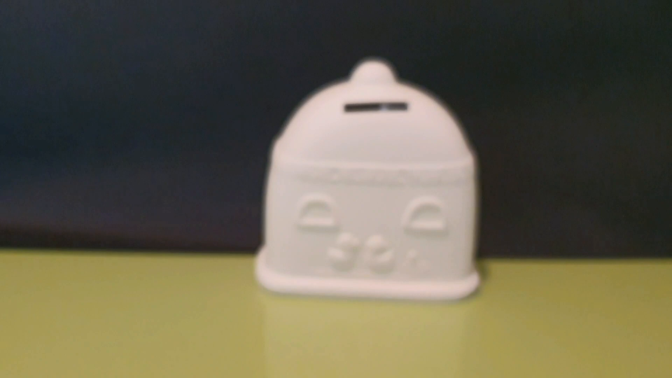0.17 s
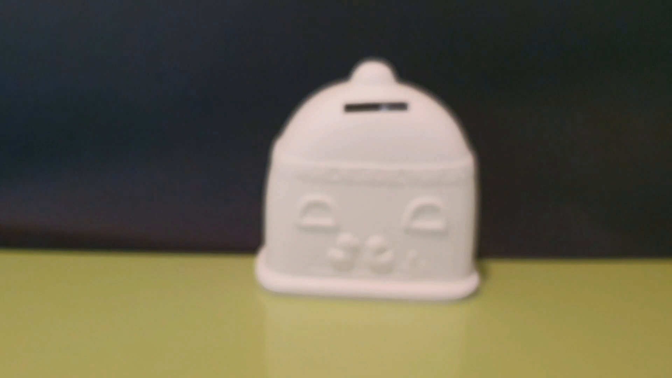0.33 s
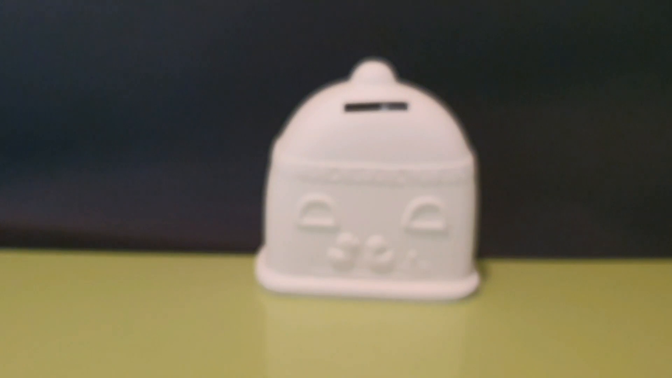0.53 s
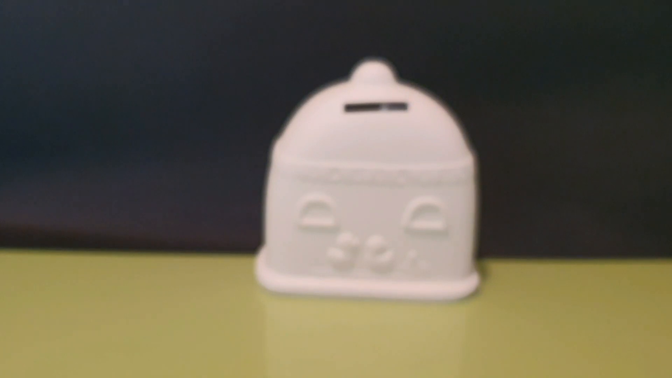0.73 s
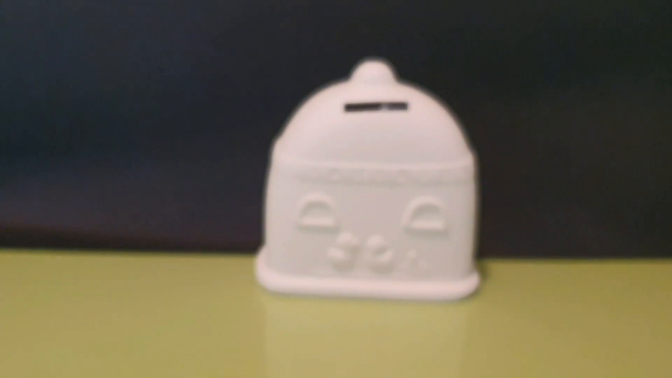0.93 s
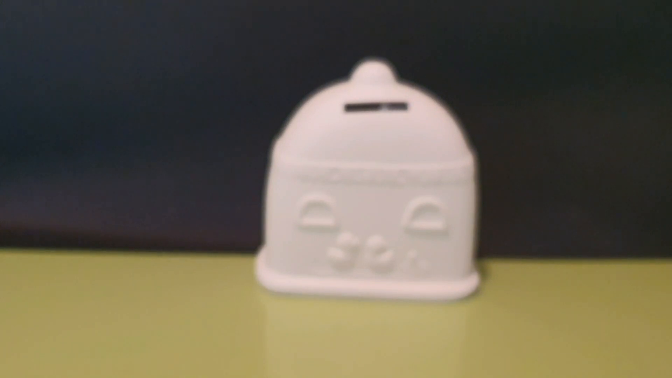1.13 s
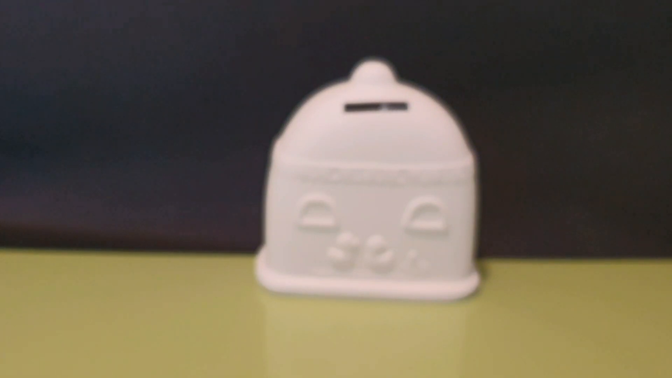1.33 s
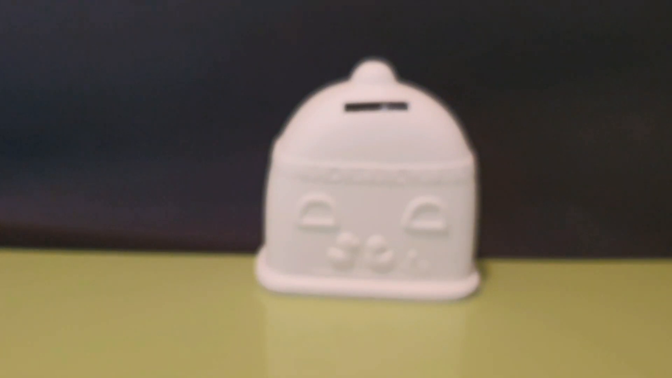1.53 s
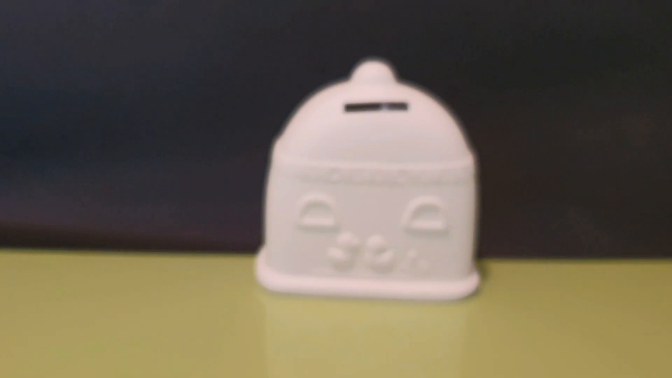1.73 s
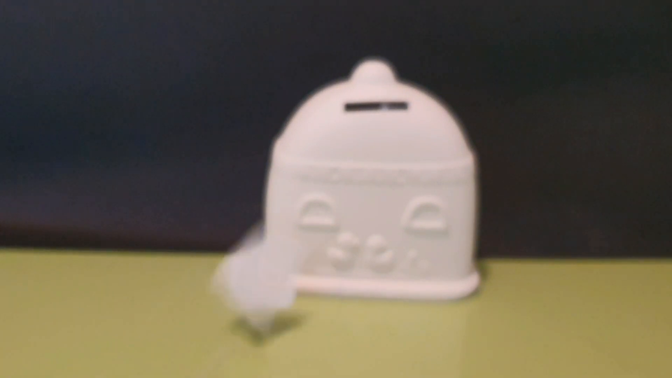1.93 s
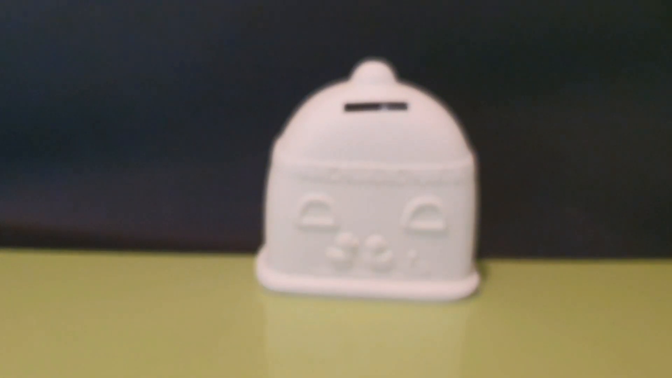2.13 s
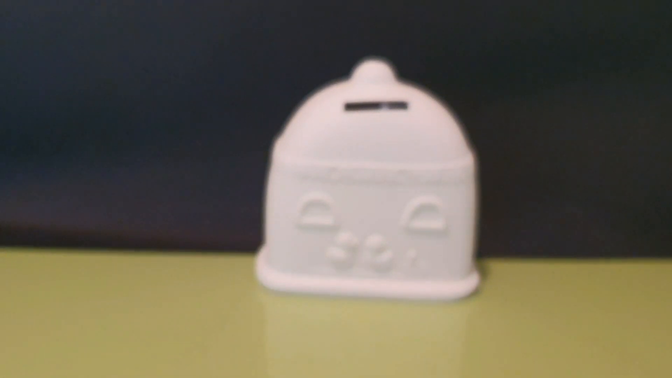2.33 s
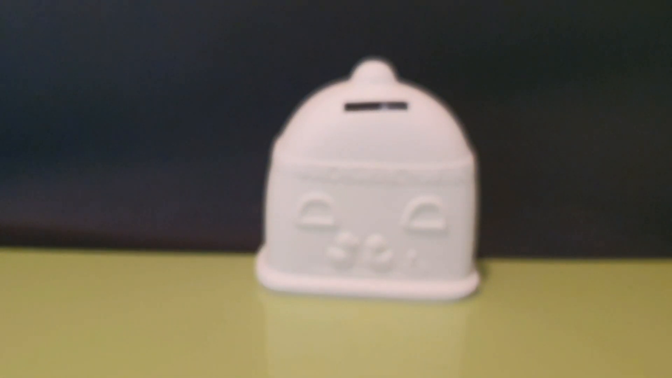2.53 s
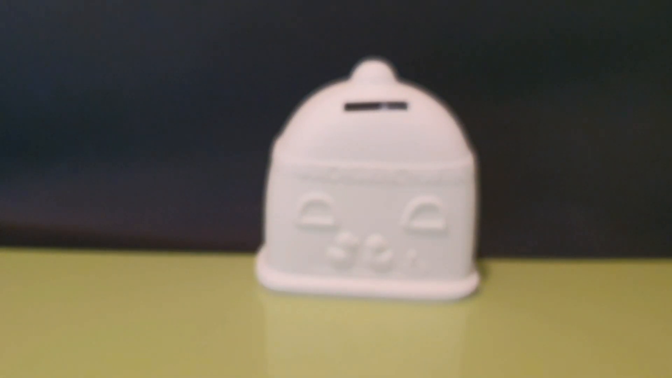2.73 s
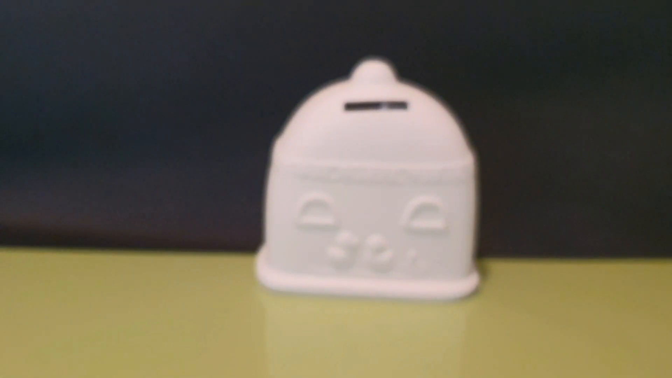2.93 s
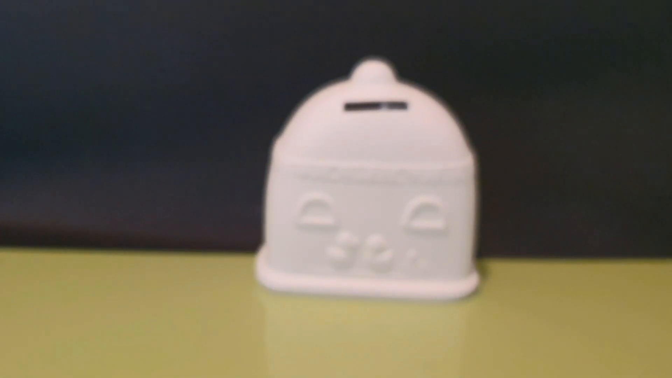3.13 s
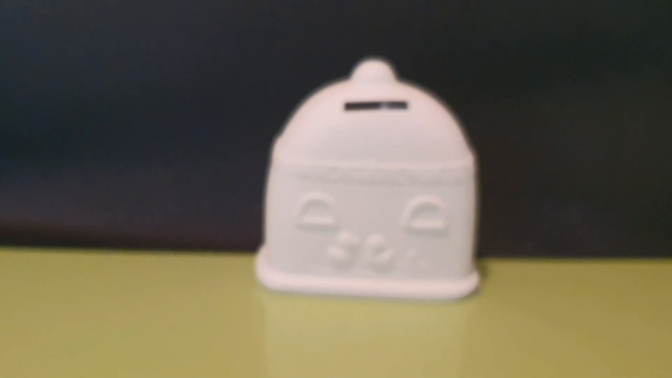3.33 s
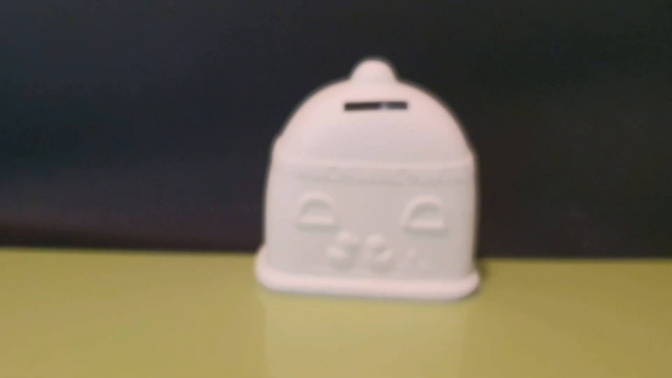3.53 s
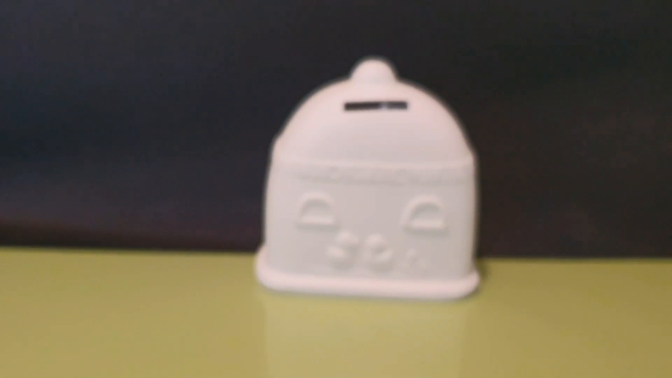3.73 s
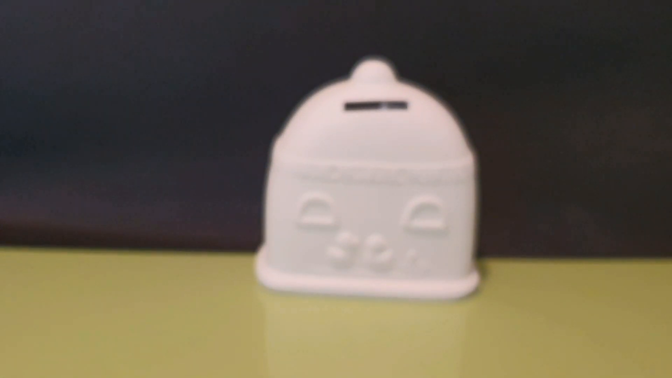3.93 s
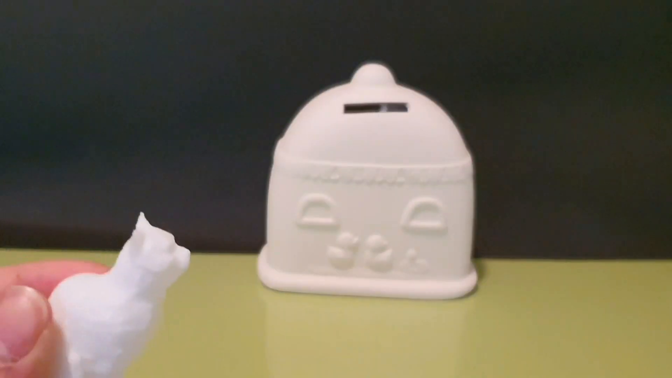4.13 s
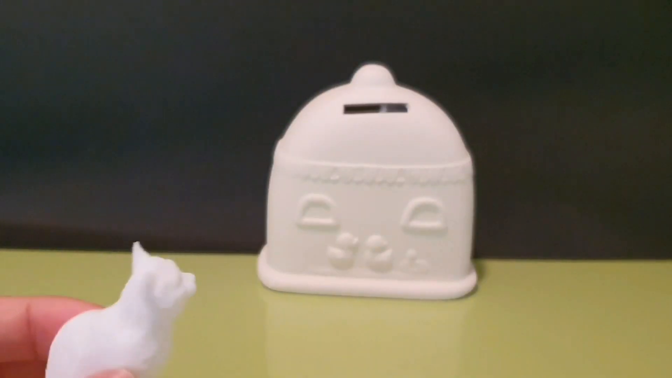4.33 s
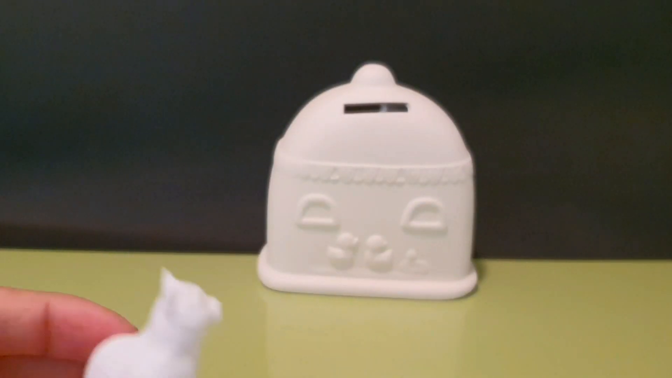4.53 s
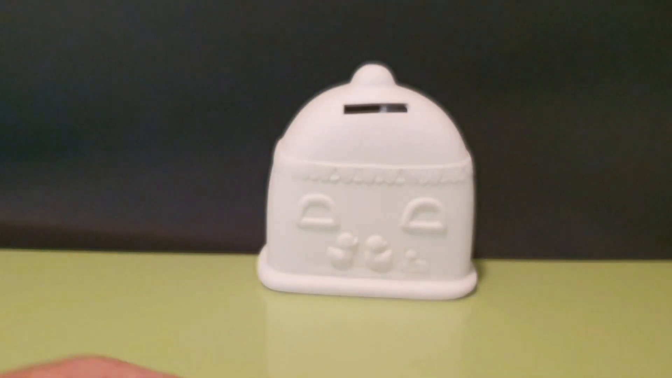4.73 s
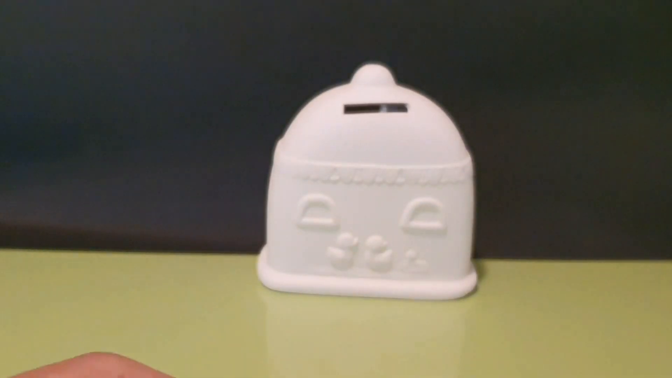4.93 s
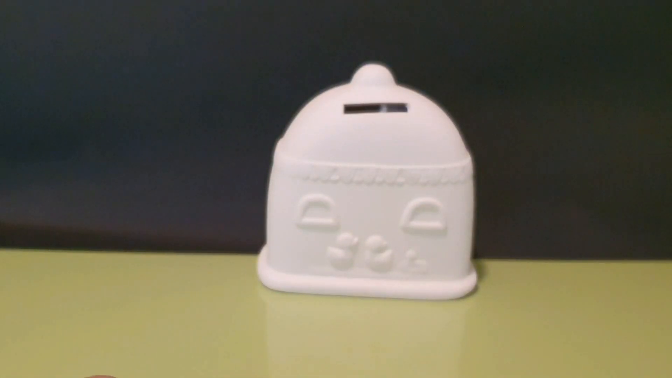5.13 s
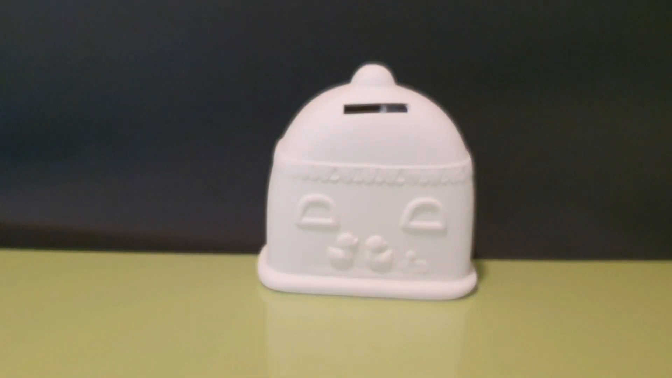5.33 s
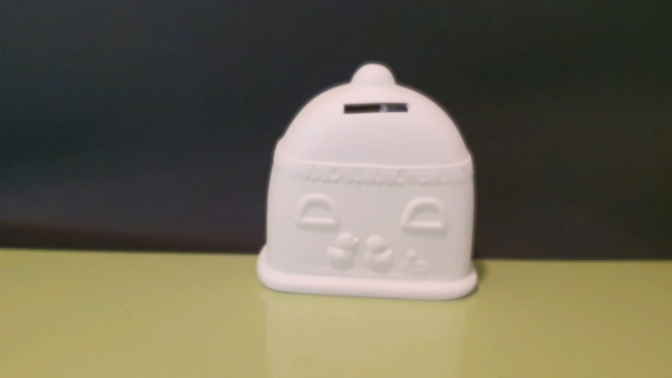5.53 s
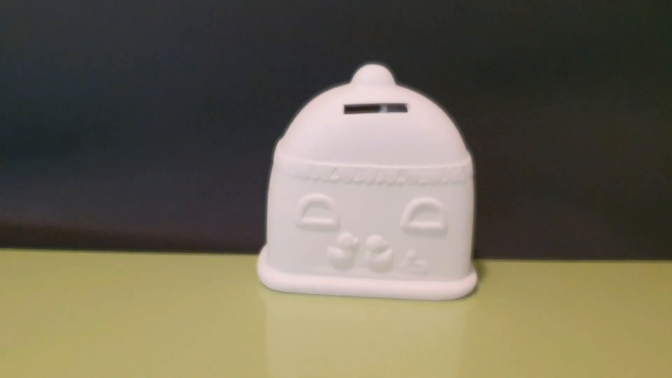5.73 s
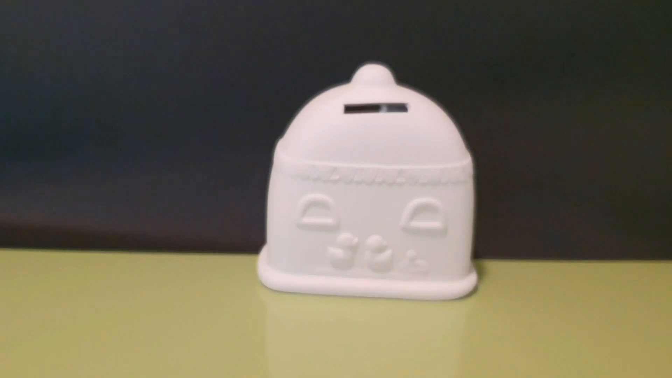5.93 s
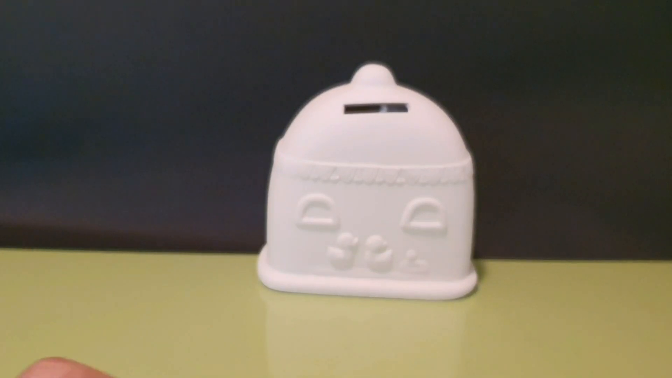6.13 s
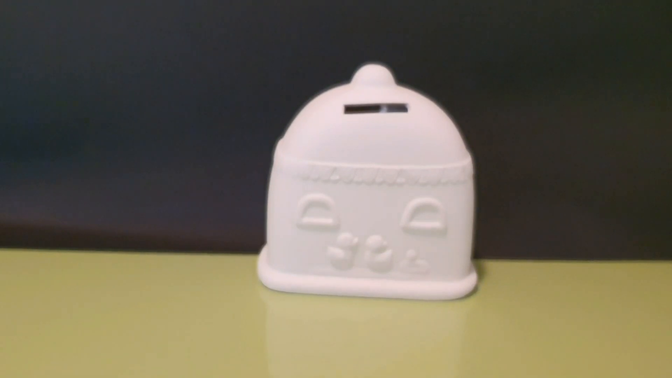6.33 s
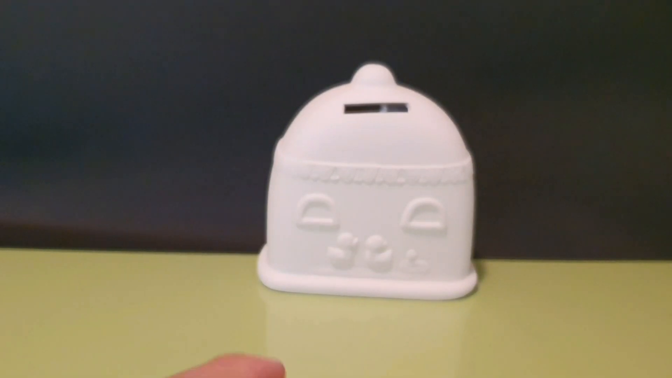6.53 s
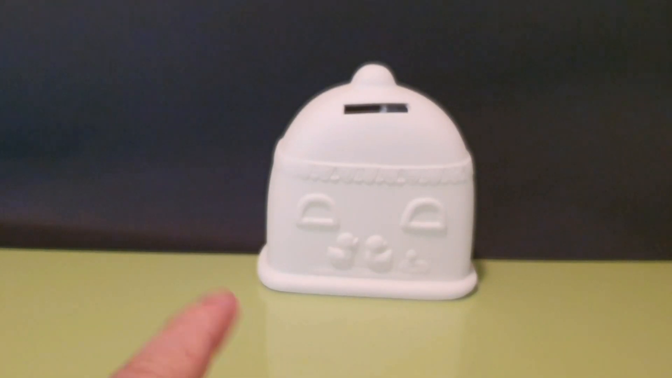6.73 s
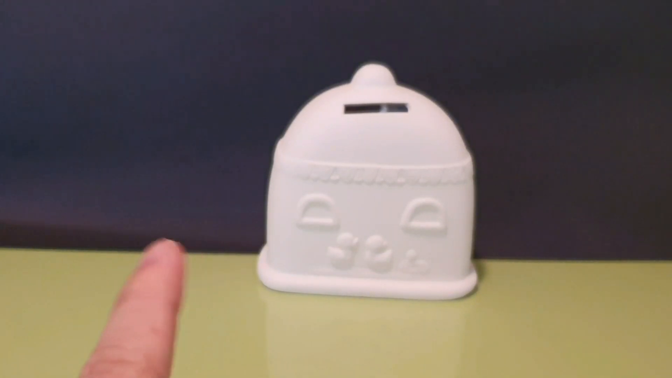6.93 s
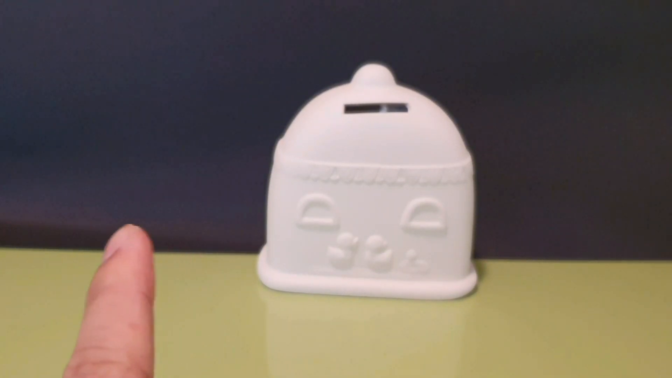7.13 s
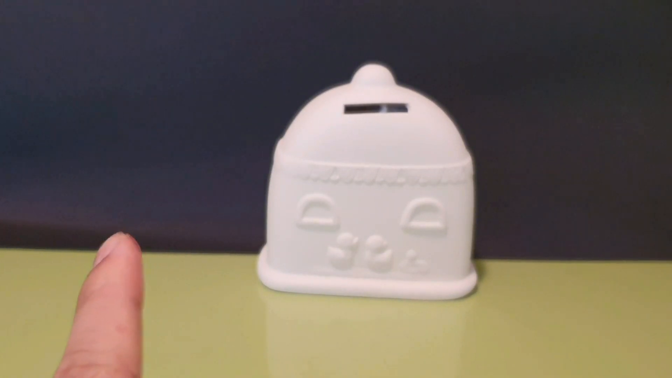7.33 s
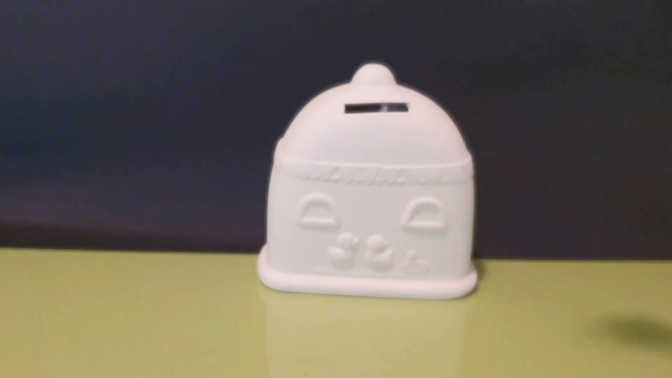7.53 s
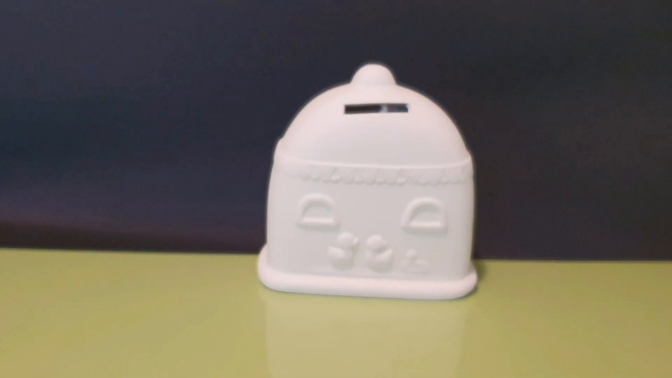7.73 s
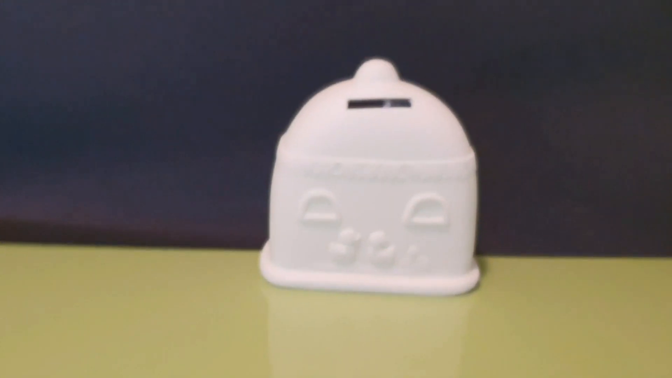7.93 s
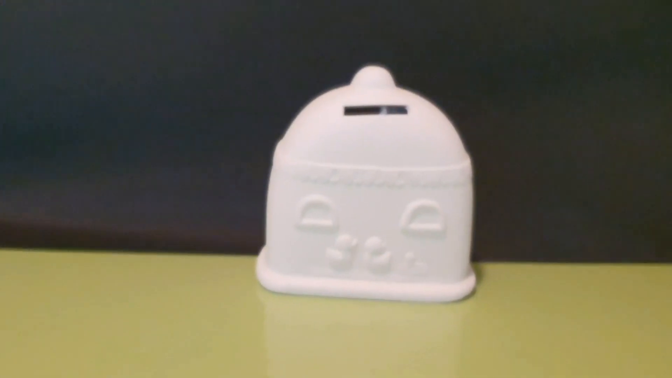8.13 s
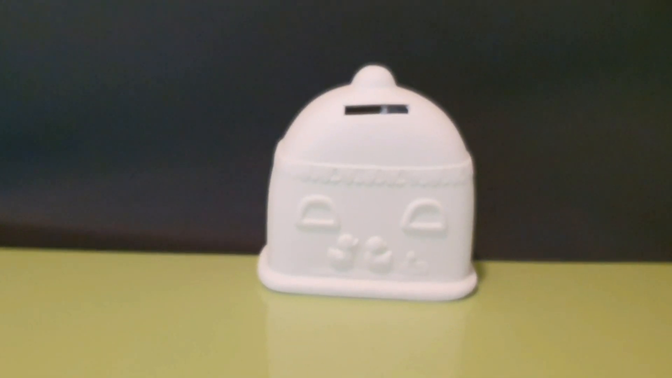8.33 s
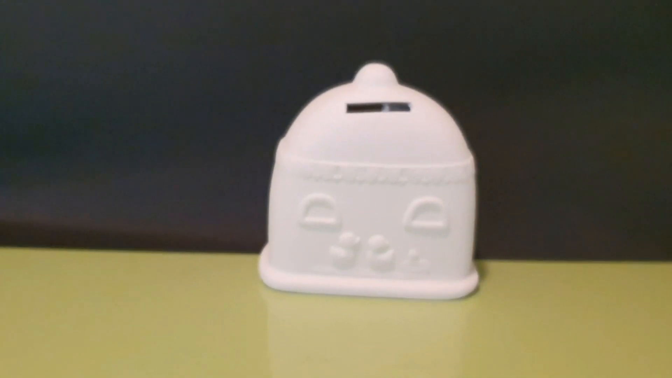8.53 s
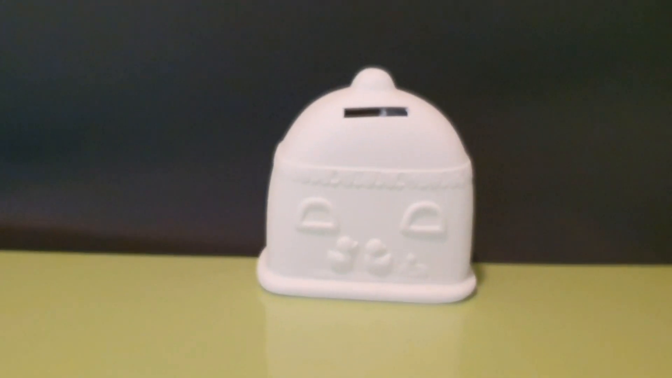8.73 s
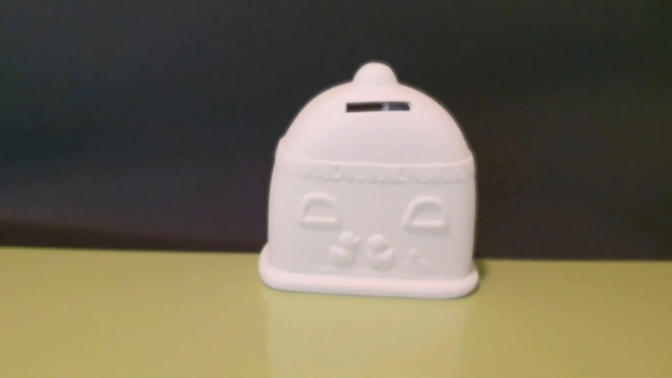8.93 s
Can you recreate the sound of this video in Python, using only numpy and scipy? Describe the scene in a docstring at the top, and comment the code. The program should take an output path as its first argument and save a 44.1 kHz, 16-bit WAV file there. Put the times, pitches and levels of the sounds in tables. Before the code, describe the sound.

Small hard plastic toys handled on a tabletop, miked closely indoors. Soft ticks lead to a sudden loud snap and quickly fading bounces. Near-silence follows, with faint skin rub and a short creak. Crisp taps and a quick irregular rattle come as a hollow figurine is placed and rocked. Another sharp crack rings briefly, then it lands to the right with a clack and brushing fabric. Short echoes, faint hum.

```python
"""Plastic toys on a table

Small hard plastic toys are handled on a table in a quiet, slightly echoing room. A block is flicked and
tumbles away; a figurine is set down and rocked, then flicked against a money box and lands with a clatter.
Each knock is a shaped burst that sets decaying tones ringing and fills the room with echoes.
Rubbing, creaking, rustling cloth, rumble, hiss and a faint low hum are shaped noise."""
import sys
import numpy as np
from scipy import signal
from scipy.fft import rfft, irfft, next_fast_len
from scipy.io import wavfile
from scipy.ndimage import uniform_filter1d

SR = 44100
rng = np.random.default_rng(int(sys.argv[2]) if len(sys.argv) > 2 else 0)


def bounce(signal):
    """Save signal as a 16-bit WAV file at the path given by the first command-line argument."""
    frames = np.transpose(np.atleast_2d(signal))
    limited = np.clip(frames, -1, 1)
    pcm = np.round(limited * 32767).astype(np.int16)
    wavfile.write(sys.argv[1], SR, pcm)


N = 395577
TIME = np.arange(N) / SR


def from_db(db):
    """Decibels to gain."""
    return 10 ** (np.asarray(db) / 20)


def rms_one(x):
    """Scale to rms 1."""
    return x / np.sqrt(np.mean(x ** 2) + 1e-20)


def unit_energy(x):
    """Scale each channel to the energy of a unit click."""
    return x / np.sqrt(np.sum(x ** 2, axis=-1, keepdims=True) + 1e-20)


def at_hz(points, hz):
    """Read (f/Hz, value) points on a log-frequency axis."""
    known_hz, values = np.transpose(points)
    return np.interp(np.log(np.maximum(hz, 1)), np.log(known_hz), values)


def in_time(rows):
    """Read each column of a curve at every sample."""
    s, *columns = np.transpose(rows)
    return [np.interp(TIME, s, column) for column in columns]


def swells(rows):
    """Smooth swells (middle t/s, length/s, level/dB), summed in power."""
    power = 0
    for middle_s, length_s, db in rows:
        distance = 2 * (TIME - middle_s) / length_s
        power = power + from_db(2 * db) * np.exp(-np.minimum(distance ** 2, 60))
    return np.sqrt(power)


# How alike left and right are [f/Hz, correlation from -1 to 1]
LEFT_RIGHT_LIKENESS = [(30, 0.97), (60, 0.91), (125, 0.5), (250, 0.6), (700, -0.18), (3000, 0.014),
                       (16000, -0.36)]


def stereo_spectrum(size):
    """Frequencies and spectrum of white stereo noise, most alike in both channels in the bass."""
    hz = np.fft.rfftfreq(size, 1 / SR)
    mid, side = rfft(rng.standard_normal((2, size)))
    alike = np.clip(at_hz(LEFT_RIGHT_LIKENESS, hz), -.99, .99)
    return hz, np.sqrt(1 + alike) * mid + np.sqrt(1 - alike) * side * [[1], [-1]]


def noise(gain_at):
    """Stereo noise of rms 1 whose spectrum follows a function of frequency."""
    hz, white = stereo_spectrum(next_fast_len(N, real=True))
    return rms_one(irfft(white * gain_at(hz))[:, :N])


def noise_through(points):
    """Stereo noise of rms 1 shaped by (f/Hz, level/dB) points."""
    return noise(lambda hz: from_db(at_hz(points, hz)))


def coloured(x, points):
    """Filter through (f/Hz, level/dB) points with no sound ahead of the input (minimum phase)."""
    cepstrum = irfft(np.log(from_db(at_hz(points, np.fft.rfftfreq(len(x), 1 / SR)))))
    cepstrum[1:len(x) // 2] *= 2
    cepstrum[len(x) // 2 + 1:] = 0
    return irfft(rfft(x) * np.exp(rfft(cepstrum)))


def evened(x, width_hz=260):
    """Flatten the broad peaks and dips of a burst, so that the object sets its colour."""
    hz = np.fft.rfftfreq(len(x), 1 / SR)
    power = uniform_filter1d(np.abs(rfft(x)) ** 2, size=int(width_hz / hz[1]) + 1)
    return unit_energy(coloured(x, np.c_[hz, -10 * np.log10(power + 1e-9)][1:]))


def resonance_power(resonances, hz):
    """Power gain of broad (f/Hz, width/Hz, level/dB) peaks."""
    return sum(from_db(2 * db) / (1 + (2 * (hz - centre) / width) ** 2) for centre, width, db in resonances)


def with_resonances(body, resonances, boost_db):
    """A body's (f/Hz, level/dB) colour with its broad resonances on top."""
    hz = np.geomspace(30, 17000, 1500)
    peaks = from_db(2 * boost_db) * resonance_power(resonances, hz)
    return np.c_[hz, at_hz(body, hz) + 10 * np.log10(1 + peaks)]


FLUTTER_S, FLUTTER_DB = .014, 1.8  # step between random gains, and their spread


def flutter(size):
    """A quickly wavering gain for each channel: reflections make a ring waver."""
    steps = TIME[:size] / FLUTTER_S
    points = rng.standard_normal((2, int(steps[-1]) + 2))
    return from_db(FLUTTER_DB * np.array([np.interp(steps, np.arange(len(p)), p) for p in points]))


# How long echoes take to fall by 60 dB [f/Hz, time/s]
ROOM_T60 = [(150, 0.67), (400, 0.33), (1000, 0.14), (2800, 0.31), (7000, 0.32), (15000, 0.24)]


def room_response(build_s, size=18000):
    """Diffuse reflections that build up quickly and die band by band."""
    hz, white = stereo_spectrum(size)
    t, tail = TIME[:size], 0
    for k, (_, t60) in enumerate(ROOM_T60):
        # neighbouring bands fade into one another
        share = at_hz([(row[0], float(j == k)) for j, row in enumerate(ROOM_T60)], hz)
        tail = tail + irfft(white * share) * from_db(-60 * t / t60)
    return unit_energy(tail * (1 - np.exp(-t / build_s)))


# Spectrum of rumble and hiss [f/Hz, relative level/dB per Hz]
AIR_COLOUR = [(15, -16), (27, 0), (40, -0.5), (60, -3.5), (90, -20.5), (130, -10.5), (280, -21.5),
              (600, -20), (1500, -25.5), (2500, -30.5), (5000, -38), (9000, -45.5), (12500, -36.5),
              (16000, -49.5)]
# Background over time [t/s, level/dB]
AIR_LEVEL = [(0, -51), (1.98, -55), (2.15, -59), (2.8, -66), (4.0, -66), (5.0, -67), (7.4, -67.5),
             (8.97, -67.5)]
# Narrow noise bands of the hum [f/Hz, width/Hz, level/dB re rumble and hiss, before HUM_LEVEL]
HUM_BANDS = [(26.1, 4.5, -9.5), (64.94, 3.9, -14), (135, 6.9, -7.5), (191, 5.54, -8), (326, 10, -26)]
# Slow rise and fall of the hum [t/s, level change/dB]
HUM_LEVEL = [(0, -0.5), (.6, 4.5), (2.0, 0.5), (3.5, -0.5), (4.6, -3), (6.0, -0.5), (7.3, -2), (8.97, -1.5)]
DROPOUT_S, DROPOUT_LENGTH_S = 4.005, 0.025
LATE_HISS_DB, LATE_HISS_ABOVE_HZ = -80.5, 3200


def background():
    """Rumble, hiss and wavering hum, all shaped noise; after a brief dropout, extra hiss joins in."""
    air = noise_through(AIR_COLOUR)
    hum = sum(from_db(db) * noise(lambda hz: 1 / (1 + (2 * (hz - centre) / width) ** 2))
              for centre, width, db in HUM_BANDS)
    bright = noise(lambda hz: from_db(at_hz(AIR_COLOUR, hz)) * (hz > LATE_HISS_ABOVE_HZ))
    late_hiss = from_db(LATE_HISS_DB) * (TIME > DROPOUT_S) * bright
    air_and_hum = air + from_db(in_time(HUM_LEVEL)[0]) * hum
    steady = from_db(in_time(AIR_LEVEL)[0]) * air_and_hum + late_hiss
    return steady * (1 - swells([(DROPOUT_S, DROPOUT_LENGTH_S, 0)]))


# A hand or heavy blow loads the table top [middle t/s, length/s, level/dB]
TABLE_LOADS = [(1.8, 0.35, -54.5), (2.015, 0.045, -38), (4.76, 0.13, -65.5), (5.03, 0.21, -66.5),
               (5.725, 0.079, -51.5), (6.17, 0.33, -62.5), (6.66, 0.066, -61.5), (7.49, 0.079, -42.5),
               (7.93, 0.077, -51)]
# Spectrum of the flexing table [f/Hz, relative level/dB per Hz]
LEANING_COLOUR = [(15, -22.5), (35, -14), (58, -2), (80, 2.5), (120, -7.5), (200, -22.5), (500, -59)]


def leaning():
    """The table top flexes and rumbles under each load: swells of low noise."""
    return swells(TABLE_LOADS) * noise_through(LEANING_COLOUR)


# Strokes of cloth [middle t/s, length/s, rub level/dB, hiss over rub/dB]
CLOTH_STROKES = [(7.75, 0.073, -51.5, 0.5), (7.937, 0.14, -44, 3), (8.224, 0.15, -54, -4),
                 (8.456, 0.22, -53, 4), (8.736, 0.21, -65.5, 5.5), (8.842, 0.042, -57, -2),
                 (8.896, 0.099, -61, 3.5)]
# Spectrum of the cloth [f/Hz, relative level/dB per Hz]
RUSTLE_COLOUR = [(88, -21), (150, -19), (286, -8), (334, -6), (504, -5), (923, -9), (1170, -9.5),
                 (1360, -9), (8730, -16.5), (12900, -17.5), (16000, -15.5)]


def rustle(grain_db, split_hz):
    """Cloth slides in strokes: a dull rub and a bright hiss, both roughened by catching threads."""
    rub_level = swells([(s, length, db) for s, length, db, _ in CLOTH_STROKES])
    hiss_level = swells([(s, length, db + hiss_db) for s, length, db, hiss_db in CLOTH_STROKES])
    threads = from_db(grain_db * rms_one(uniform_filter1d(rng.standard_normal(N), size=120)))
    rub = noise(lambda hz: from_db(at_hz(RUSTLE_COLOUR, hz)) * (hz < split_hz))
    hiss = noise(lambda hz: from_db(at_hz(RUSTLE_COLOUR, hz)) * (hz >= split_hz))
    return (rub_level * rub + hiss_level * hiss) * threads


# Fingers slide on the figurine [middle t/s, length/s, level/dB]
FINGER_RUBS = [(3.55, .12, -76), (3.83, 0.32, -82), (4.06, 0.037, -63.5), (4.3, 0.29, -72),
               (4.56, 0.072, -73.5), (4.76, 0.24, -67), (5.06, 0.084, -68)]
# Spectrum of skin on plastic [f/Hz, relative level/dB per Hz]
FINGERS_COLOUR = [(100, -6), (600, -3), (1400, -6.5), (2500, 4.5), (3600, -9.5), (5500, -7), (9000, -27),
                  (13000, -12), (16000, -20)]


def fingers():
    """Skin rubs faintly on plastic while the figurine is held up: swells of noise."""
    return swells(FINGER_RUBS) * noise_through(FINGERS_COLOUR)


# A fingertip sticks and slips [middle t/s, length/s, level/dB]
CREAKS = [(4.686, 0.021, -53), (4.737, 0.06, -56), (4.803, 0.022, -65)]
# Resonances of the dull creak [f/Hz, width/Hz, relative level/dB]
CREAK_RESONANCES = [(490, 34, 2), (569, 54, -22), (675, 65, -12.5), (1670, 110, -18.5)]


def creaks():
    """Rough friction, made of noise, drives a few low resonances."""
    return swells(CREAKS) * noise(lambda hz: np.sqrt(resonance_power(CREAK_RESONANCES, hz)))


# Short hiss swells just before or between knocks [middle t/s, length/s, level/dB]
BRIGHT_SWELLS = [(2.05, 0.015, -21.5), (5.134, 0.015, -55), (5.72, 0.1, -65), (5.774, 0.0048, -42),
                 (6.014, 0.0081, -58)]
# Spectrum of these swells [f/Hz, relative level/dB per Hz]
BRIGHT_COLOUR = [(100, -18.5), (700, -4), (2300, -2.5), (2900, 5), (4000, 0), (5200, 3.5), (6400, -3),
                 (8000, -0.5), (11000, -5), (16000, -9)]
# Thin, high hiss swells, mostly just before knocks [middle t/s, length/s, level/dB]
THIN_SWELLS = [(1.976, 0.014, -51), (1.9885, 0.0041, -15), (5.06, 0.045, -70), (5.42, 0.022, -75),
               (5.745, 0.03, -54), (7.44, 0.0053, -48)]
# Spectrum of the thin swells [f/Hz, relative level/dB per Hz]
THIN_COLOUR = [(300, -24.5), (3000, -22), (4700, -13.5), (5600, -2), (6600, -4), (7600, 4), (8800, -2),
               (10300, -3.5), (13000, -6), (16000, -11)]


def hiss_swells():
    """Brief swells of bright noise, some thinner and higher, mostly lead into knocks."""
    bright = swells(BRIGHT_SWELLS) * noise_through(BRIGHT_COLOUR)
    thin = swells(THIN_SWELLS) * noise_through(THIN_COLOUR)
    return bright + thin


# Short tones as toys settle, are lifted and knocked about
# [start t/s, f/Hz, level/dB before direct_db and room_db, time to fall 60 dB/s]
FAINT_RINGS = [(2.367, 5300, -45, .025), (2.423, 4550, -46, .04), (2.626, 5100, -51, .03),
               (4.027, 3397, -63, .42), (4.027, 3343, -65, .36), (4.03, 3445, -68, .3),
               (6.76, 4510, -81, .5), (6.85, 4470, -84, .35), (7.04, 4570, -81, .5),
               (7.859, 560, -21, .022), (7.86, 660, -25, .02)]


def lone_rings(rise_share, direct_db, room_db):
    """Single tones that start softly and die away in the room."""
    out = np.zeros((1, N))
    for s, hz, db, t60 in FAINT_RINGS:
        t = TIME[:N - round(s * SR)]
        rise = 1 - np.exp(-t / (rise_share * t60))
        out[:, N - len(t):] += from_db(db - 60 * t / t60) * rise * np.sin(2 * np.pi * hz * t)
    echo = signal.oaconvolve(out, room_response(build_s=0.00094), axes=1)[:, :N]
    return from_db(direct_db) * out * flutter(N) + from_db(room_db) * echo


def near_response(scatter_db, scatter_s, size=1500):
    """The direct path, then a few ms of scatter from the table top and things on it."""
    scatter = unit_energy(rng.standard_normal((2, size)) * np.exp(-TIME[:size] / scatter_s))
    both = signal.unit_impulse(size) + from_db(scatter_db) * scatter
    return np.array([evened(side) for side in both])


def contact(scuff_s, size=8192):
    """A short touch is mostly one clean snap; a longer one is a burst of slips that swells and dies."""
    age = TIME[:size] / max(scuff_s, 1e-4)
    slips = rng.standard_normal(size) * from_db(2.0 * rng.standard_normal(size))
    slips = unit_energy(slips * (1 - np.exp(-age)) * np.exp(-age * 1.2))
    snap_share = np.exp(-scuff_s / 0.0021)
    return evened(np.sqrt(snap_share) * signal.unit_impulse(size) + np.sqrt(1 - snap_share) * slips)


# the thump peaks higher for harder touches; its top is rounded
THUMP_HZ, THUMP_TOP_OCTAVES = 886, 0.54
BASS_HZ, TREBLE_HZ = 264, 9700  # beyond these a touch's colour is level


def contact_colour(thump_db, hardness, click_db, thump_fall_db, click_rise_db):
    """A thump that falls off around its pitch and a click that rises, both in dB per octave."""
    hz = np.geomspace(BASS_HZ, TREBLE_HZ, 24)
    octaves_off = np.log2(hz / THUMP_HZ) - hardness
    away = np.hypot(octaves_off, THUMP_TOP_OCTAVES) - THUMP_TOP_OCTAVES
    thump = from_db(thump_db - thump_fall_db * away)
    click = from_db(click_db + click_rise_db * np.log2(hz / TREBLE_HZ))
    return list(zip(hz, 20 * np.log10(np.hypot(thump, click))))


RING_BUILD_S, RING_LATE_SHARE = .018, .55  # reflections make a ring swell after the blow


def ringing(modes, size=18000):
    """One decaying tone per mode, with its own phase and flutter in each channel."""
    t = TIME[:size]
    build = 1 - RING_LATE_SHARE * np.exp(-t / RING_BUILD_S)
    rings = []
    for hz, db, t60 in modes:
        tone = np.sin(2 * np.pi * hz * t + rng.uniform(-1.5, 1, (2, 1)))
        rings.append(from_db(db - 60 * t / t60) * build * flutter(size) * tone)
    return np.array(rings)


# Standing waves of table and room [f/Hz, relative level/dB, time to fall 60 dB/s]
ROOM_MODES = [(184, -46, .35), (330, -42, .32), (468, -46, .28), (742, -48, .22), (827, -43, .22),
              (1103, -47, .18)]
MODE_SPREAD_DB = 1.3  # each touch lands on another spot and favours other modes


def knocks(contacts, body, modes, thump_fall_db, click_rise_db, ring_db, scatter_db, scatter_s, damping_s):
    """A group of contacts: each is heard directly, sets the modes ringing and fills the room."""
    out = np.zeros((2, N + SR))
    rings = np.concatenate([from_db(ring_db) * ringing(modes), ringing(ROOM_MODES)])
    for s, scuff_s, direct_db, pan_db, thump_db, hardness, click_db in contacts:
        colour = contact_colour(thump_db, hardness, click_db, thump_fall_db, click_rise_db)
        blow = coloured(coloured(contact(scuff_s), colour), body)
        # the object moves between touches, so each one finds other reflections
        paths = room_response(build_s=.001)
        near = near_response(scatter_db, scatter_s)
        pan = rms_one(from_db([[pan_db / 2], [-pan_db / 2]]))
        paths[:, :near.shape[1]] += from_db(direct_db) * pan * near
        mode_gains = from_db(rng.normal(0, MODE_SPREAD_DB, len(rings)))
        ring = np.tensordot(mode_gains, rings, axes=1)
        # a lingering touch damps the ring
        strike = coloured(signal.unit_impulse(len(blow)), colour) / (1 + (scuff_s / damping_s) ** 2)
        heard_blow = signal.fftconvolve(blow[None], paths, axes=1)
        heard_ring = signal.fftconvolve(strike[None], ring, axes=1)
        sound = heard_blow + heard_ring
        at = round(s * SR)
        out[:, at:at + sound.shape[1]] += sound
    return out[:, :N]


# In every table of touches, thump and click levels are those before the body colours the blow,
# and hardness is counted in octaves above THUMP_HZ. Mode levels are those before ring_db.
# Small bright ticks: light taps, and clicks as the block tumbles
# [t/s, scuff/s, direct over room/dB, left over right/dB,
# thump level/dB, hardness/octaves, click level/dB]
SMALL_TICKS = [(0.38,0.0034,1,2,-7,-0.87,-18.5), (0.512,0.0031,2.5,2,-4,-1.5,-16.5),
               (0.69,0.026,-3,13,-11,0,-29), (0.772,0.0023,1,11,-13.5,-0.76,-30),
               (1.136,0.0016,1,3,-13,-1.3,-33), (2.367,0.001,0,3,-10,0.5,-27),
               (2.416,0.0023,0,8,-17,0.5,-29), (2.4235,0.0012,-1.5,10,-22,2.5,-30),
               (2.45,0.0017,2,6,-5.5,-1.5,-18.5), (2.471,0.002,-2,7,-13,0.04,-22),
               (2.627,0.0025,0.5,3,-26.5,2,-35.5), (4.37,0.0039,-0.5,3,-34,-0.5,-43.5)]
# Colour of a tick [f/Hz, level/dB]
TICK_BODY = [(40, -43), (200, -36), (330, 0), (480, -5), (3000, -2.5), (4200, 2), (5000, -3), (6800, 5),
             (9000, -0.5), (10800, -2), (13000, -5), (14700, -9), (16000, -24)]
# Broad resonances of the ticks [f/Hz, width/Hz, level/dB before boost_db]
TICK_RESONANCES = [(4200, 500, 8), (7200, 260, 11), (9150, 450, 11), (13000, 900, 10)]
# Ringing of a tick [f/Hz, level/dB, time to fall 60 dB/s]
TICK_MODES = [(4250, -8, 0.13), (6260, -3, .18), (7117, 10, 0.15), (8312, -10, .12), (9400, -6, 0.18),
              (10360, -8, 0.24), (12660, -2, .2)]


def small_ticks():
    """Small bright ticks with high, short rings."""
    body = with_resonances(TICK_BODY, TICK_RESONANCES, boost_db=-2.5)
    return knocks(SMALL_TICKS, body, TICK_MODES, thump_fall_db=11.5, click_rise_db=7,
                  ring_db=-47, scatter_db=10.0, scatter_s=0.0017, damping_s=0.02)


# The flicked block tumbles [t/s, scuff/s, direct over room/dB, left over right/dB,
# thump level/dB, hardness/octaves, click level/dB]
BLOCK_TUMBLE = [(1.988,0.0051,4.5,3,13.6,-0.6,-1), (1.995,0.0078,-5.5,-4,20.2,-0.54,5.5),
                (2.0577,0.00067,6.5,7,11,1.08,-5.5), (2.0595,0.014,-12,4,11,1.82,-17),
                (2.111,0.0089,-4.5,-9,12.9,0.24,-27)]
# Colour of the block's blows [f/Hz, level/dB]
BLOCK_BODY = [(30, -19.5), (120, -6.5), (260, -8.5), (330, 2), (480, -3), (780, 1), (1250, -5.5), (1615, 1),
              (2150, 1), (2550, -2.5), (2900, 2.5), (3400, -1.5), (4000, 0.5), (5200, 1.5), (6200, 1),
              (7400, 2), (12500, 1), (16000, -6)]
# Ringing after the block's blows, mostly of the money box it hits
# [f/Hz, level/dB, time to fall 60 dB/s]
BLOCK_BLOW_MODES = [(828, -3, .2), (1613, 8, .19), (1720, -5, .2), (1845, -7, .2), (1960, -5, .2),
                    (2034, -3, .22), (2730, -5, .27), (2780, 0, .32), (2797, -4, .34), (2983, -4, .3),
                    (3921, -6, .45), (4581, -6, .2), (4856, -8, .24), (5430, -5, .3), (6740, -6, .28),
                    (7111, -1, .27), (8737, -6, .25)]


def block_tumble():
    """Loud hard blows of the tumbling block, with the ringing they set off."""
    return knocks(BLOCK_TUMBLE, BLOCK_BODY, BLOCK_BLOW_MODES, thump_fall_db=9.5, click_rise_db=5.5,
                  ring_db=-32.5, scatter_db=-2, scatter_s=.004, damping_s=.0018)


# The block bounces far off [t/s, scuff/s, direct over room/dB, left over right/dB,
# thump level/dB, hardness/octaves, click level/dB]
FAR_BOUNCES = [(2.2545,0.0027,-2,5,4.5,0.54,-42), (2.259,0.0018,-3.5,3,5,0.46,-42),
               (2.278,0.0027,-4,2,-8,1,-45), (2.3505,0.0015,-0.5,-5,-2.5,0.35,-20),
               (2.369,0.0042,-5,6,-3,0.5,-34), (2.423,0.0056,-5,10,-11,0.32,-36),
               (2.453,0.005,-1.5,-3,-12,-0.89,-45), (2.473,0.0041,-1,1,-6.5,-0.27,-38)]
# Colour of the far bounces [f/Hz, level/dB]
BOUNCE_BODY = [(30, -19), (120, -7), (250, 7), (330, 6), (480, 0.5), (780, -2.5), (1250, -1.5), (1700, 3),
               (2300, 0.5), (3300, -0.5), (4500, -4), (6000, -2.5), (7400, -7), (12500, -3), (16000, -10)]


def far_bounces():
    """Softer blows make the same modes ring more faintly."""
    return knocks(FAR_BOUNCES, BOUNCE_BODY, BLOCK_BLOW_MODES, thump_fall_db=10, click_rise_db=4,
                  ring_db=-51, scatter_db=8, scatter_s=0.0037, damping_s=0.0043)


# The figurine is set down [t/s, scuff/s, direct over room/dB, left over right/dB,
# thump level/dB, hardness/octaves, click level/dB]
TABLE_TAPS = [(5.142,0.00043,3,1,1.5,-0.88,-18.5), (5.1438,0.00087,2.5,4,-0.5,-0.048,-20),
              (5.402,0.0035,0,2,-27,-0.69,-36.5), (5.621,0.0027,-2,3,-8.5,-0.29,-32.5),
              (5.7758,0.0025,1,-0.5,15,1.36,-1), (5.7855,0.0029,3.5,0,9,0.027,0)]
# Colour of the taps [f/Hz, level/dB]
TABLE_BODY = [(40, -34), (110, -6), (180, 4.5), (330, -2), (520, 5), (700, -2.5), (1050, 1), (1600, -4),
              (2000, -2), (2400, -8), (2950, -10), (3750, -14), (4350, -9.5), (4900, -16.5), (5800, -6),
              (6600, -5.5), (12500, -13), (16000, -17)]
# Ringing of the table, with two high tones of the figurine; also used for the rocking
# [f/Hz, level/dB, time to fall 60 dB/s]
TABLE_AND_FIGURINE_MODES = [(184, -1, 0.43), (326, 6, 0.33), (774, 0, .22), (985, 2, .22), (1286, 0, 0.22),
                            (1392, -1, .22), (1519, 6, 0.24), (1663, 1, .3), (1813, 2, .22),
                            (1954, 3, 0.24), (3685, -4, 0.3), (4280, -1, 0.3)]
# Broad resonances of the hollow figurine in all its knocks [f/Hz, width/Hz, level/dB before boost_db]
FIGURINE_RESONANCES = [(3740, 150, 11), (4350, 140, 13)]


def table_taps():
    """The hollow figurine colours its taps, and table and figurine ring on."""
    body = with_resonances(TABLE_BODY, FIGURINE_RESONANCES, boost_db=-3.0)
    return knocks(TABLE_TAPS, body, TABLE_AND_FIGURINE_MODES, thump_fall_db=12.5, click_rise_db=3.5,
                  ring_db=-51.5, scatter_db=10, scatter_s=0.0026, damping_s=0.0059)


# The figurine is rocked into place [t/s, scuff/s, direct over room/dB, left over right/dB,
# thump level/dB, hardness/octaves, click level/dB]
FIGURINE_ROCKING = [(6.018,0.0009,2.5,0,-0.5,0.87,-8.5), (6.022,0.001,0,-5,2,2,-10),
                    (6.0335,0.0012,0,-0.5,3,1.1,-4.5), (6.047,0.001,-4,-1,10.5,0.77,-8),
                    (6.06,0.0014,-6,1,8,0.4,-9.5), (6.074,0.0017,-8,14,2,0,-16),
                    (6.087,0.0009,-12,3,-1,0.5,-1), (6.096,0.00071,-19,5,7.5,0.5,-7),
                    (6.104,0.0016,8,9,-11,1,-28), (6.117,0.0017,-5,8,3.5,1,-16),
                    (6.133,0.0015,7.5,11,-5.5,0.63,-21), (6.148,0.0015,-8,11,2,1,-42),
                    (6.19,0.0013,-20,11,4.5,0,-19), (6.209,0.0035,-2,13,-8,1.36,-30),
                    (6.23,0.0023,-4.5,19,-7,-0.5,-30), (6.305,0.0039,8,11,-23,-0.7,-49),
                    (6.344,0.00093,-4.5,-3,-17.5,0,-35.5), (6.467,0.0066,-8,4,-9,0.3,-36),
                    (6.508,0.0037,-6,5.5,-4,0.5,-36.5), (6.52,0.00094,0.5,17,-11.5,-0.5,-35),
                    (6.565,0.0045,-6,-2,-23,-2.5,-28), (6.78,0.0027,-2.5,5,-22,-0.64,-46),
                    (6.991,0.0078,-13.5,6,-14.5,0,-42.5), (7.023,0.003,-2.5,7,-9,0.23,-41)]
# Colour of the rocking [f/Hz, level/dB]
ROCKING_BODY = [(40, -24), (110, -8.5), (180, 6), (330, -2), (520, 1), (700, 5), (1050, 2), (1600, -6.5),
                (2000, -4.5), (2400, -14), (2750, -18), (3150, -20.5), (3750, -11.5), (4350, -16.5),
                (4800, -14.5), (5800, -4.5), (6600, -8.5), (8300, -8.5), (10300, -14.5), (12500, -10),
                (16000, -18)]


def figurine_rocking():
    """A rattle of small touches as the hollow figurine rocks; table and figurine ring."""
    body = with_resonances(ROCKING_BODY, FIGURINE_RESONANCES, boost_db=-2.5)
    return knocks(FIGURINE_ROCKING, body, TABLE_AND_FIGURINE_MODES, thump_fall_db=12.5, click_rise_db=0.5,
                  ring_db=-53, scatter_db=6, scatter_s=0.0039, damping_s=0.0043)


# The figurine is flicked, slides and hits the money box
# [t/s, scuff/s, direct over room/dB, left over right/dB,
# thump level/dB, hardness/octaves, click level/dB]
FIGURINE_FLICK = [(7.443,0.0041,-1,5,8.7,-1.7,-2), (7.464,0.048,-3,-1,13.3,-1.1,5),
                  (7.496,0.0018,1,10,12.4,0.24,3), (7.4995,0.00011,11.5,1.5,9.2,1.56,0),
                  (7.545,0.012,-12,8,2.6,1.3,-9)]
# Colour of the flick, slide and blows [f/Hz, level/dB]
FLICK_BODY = [(30, -10), (130, -1), (300, 2.5), (420, 1.5), (560, 2), (1100, 7), (2000, 5), (2500, -4),
              (2850, 2), (3400, -3), (4350, -2.5), (5700, 3), (7500, -3.5), (9400, 0), (11300, -5),
              (12900, -0.5), (16000, -2.5)]
# Ringing of the figurine, also as it lands [f/Hz, level/dB, time to fall 60 dB/s]
FIGURINE_MODES = [(3752, -2, .37), (3790, -7, .3), (4312, -3.5, .42), (4378, -3, .38), (5430, -13, .3),
                  (6250, -13, .29), (6770, -14, .3), (6920, -11, .3)]
# Ringing of the money box [f/Hz, level/dB, time to fall 60 dB/s]
BOX_MODES = [(607, 2, .24), (743, 5, .26), (828, 4, .24), (1055, 2, .2), (1520, 1, .24), (1608, 6, .28),
             (1735, 1, .22), (1895, 0, .22), (2005, 4, .3), (2031, 6, .27), (2725, 0, .24), (2775, 1, .24),
             (2982, 0, .32), (4032, -3, .34), (5766, 3, .22), (6481, -1, .3)]


def figurine_flick():
    """The flick and blows set both the figurine and the money box ringing."""
    body = with_resonances(FLICK_BODY, FIGURINE_RESONANCES, boost_db=-2.0)
    modes = [*FIGURINE_MODES, *BOX_MODES]
    return knocks(FIGURINE_FLICK, body, modes, thump_fall_db=23.5, click_rise_db=1.0,
                  ring_db=-43.5, scatter_db=0, scatter_s=.004, damping_s=.009)


# The figurine lands [t/s, scuff/s, direct over room/dB, left over right/dB,
# thump level/dB, hardness/octaves, click level/dB]
FIGURINE_LANDING = [(7.857,0.0029,8.5,-16,-14.5,2,-13), (7.89,0.0067,0,-24,-11,-5,-3),
                    (7.9125,0.0017,11.5,-18,10,-2,0.5), (7.996,0.0006,6.5,-10,-8,0,-19),
                    (8.198,0.0079,-5,3,-14,0.5,-27), (8.228,0.0065,2,-2,-12,-1,-28.5)]
# Colour of the landing [f/Hz, level/dB]
LANDING_BODY = [(30, -13), (130, -3.5), (230, 0.5), (360, 3), (520, 9.5), (1000, 3), (1300, 7.5),
                (1700, 6.5), (2300, 4), (3100, 0.5), (4300, -2.5), (4850, -1.5), (5350, 4.5), (6250, -3),
                (6850, 3), (7800, -7), (9000, -2), (10300, -11), (12200, 1.5), (16000, -2)]


def figurine_landing():
    """The figurine lands with a clatter and its own modes ring."""
    body = with_resonances(LANDING_BODY, FIGURINE_RESONANCES, boost_db=0.5)
    return knocks(FIGURINE_LANDING, body, FIGURINE_MODES, thump_fall_db=30.0, click_rise_db=0.5,
                  ring_db=-37, scatter_db=-1, scatter_s=.004, damping_s=.009)


def scene():
    """All the toys sound in the same room."""
    rings = lone_rings(rise_share=0.033, direct_db=3.0, room_db=-3)
    handling = leaning() + rustle(grain_db=1.0, split_hz=2700) + fingers() + creaks()
    block = block_tumble() + far_bounces()
    figurine = table_taps() + figurine_rocking() + figurine_flick() + figurine_landing()
    return background() + handling + hiss_swells() + rings + small_ticks() + block + figurine


CUTOFF_HZ = 16600


def record(dry):
    """The highest peaks are rounded and the top is cut."""
    rounded = dry / (1 + (dry / .74) ** 4) ** .25
    return signal.sosfilt(signal.cheby2(14, 70, CUTOFF_HZ, fs=SR, output="sos"), rounded)


dry = scene()
out = record(dry)
bounce(out)
```